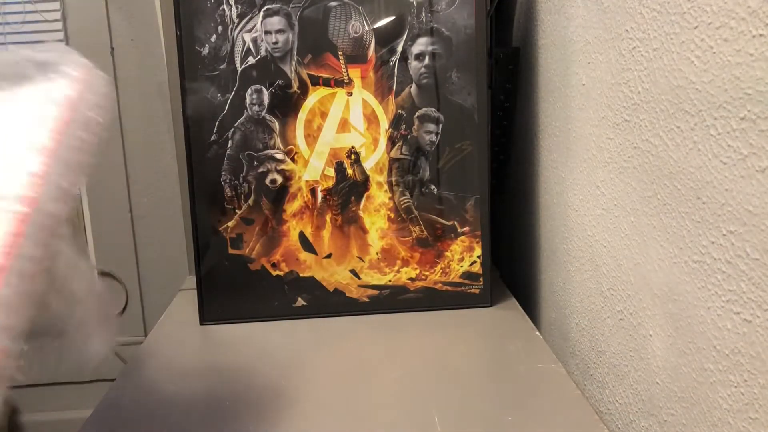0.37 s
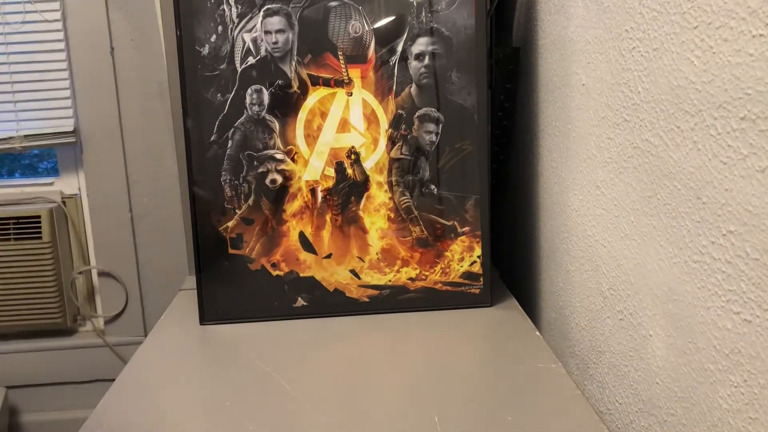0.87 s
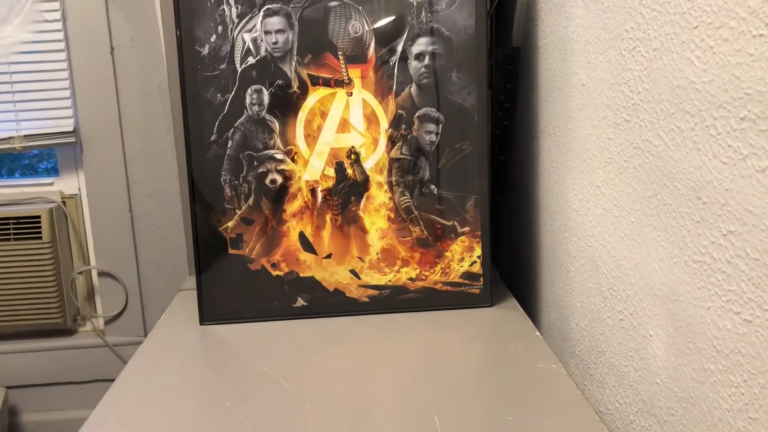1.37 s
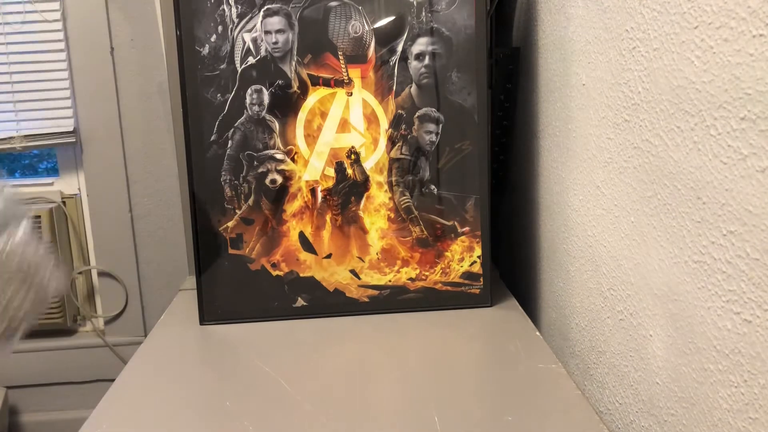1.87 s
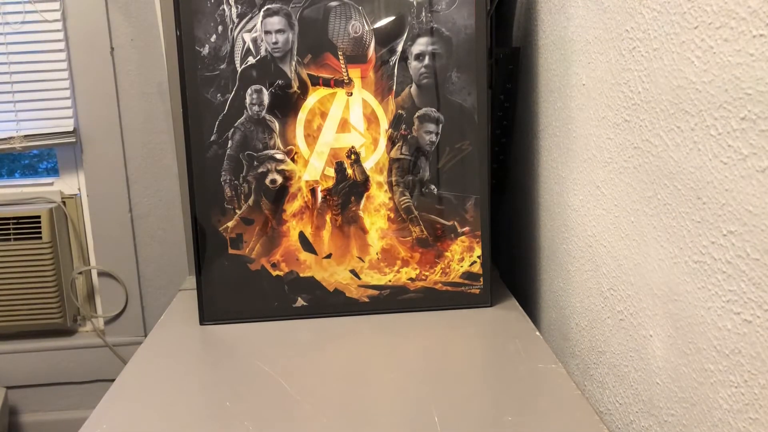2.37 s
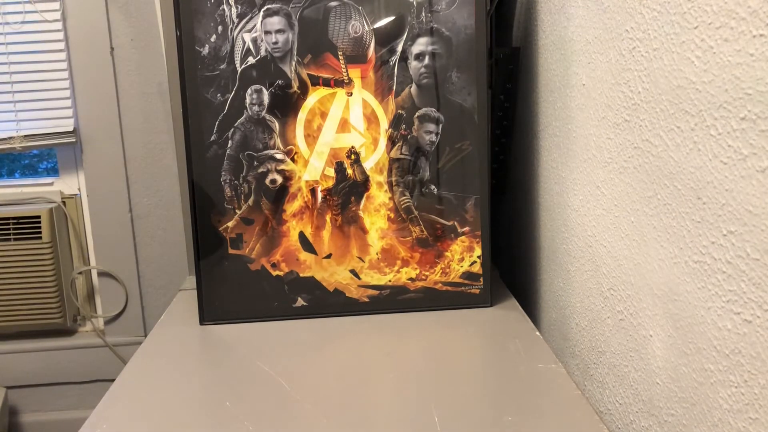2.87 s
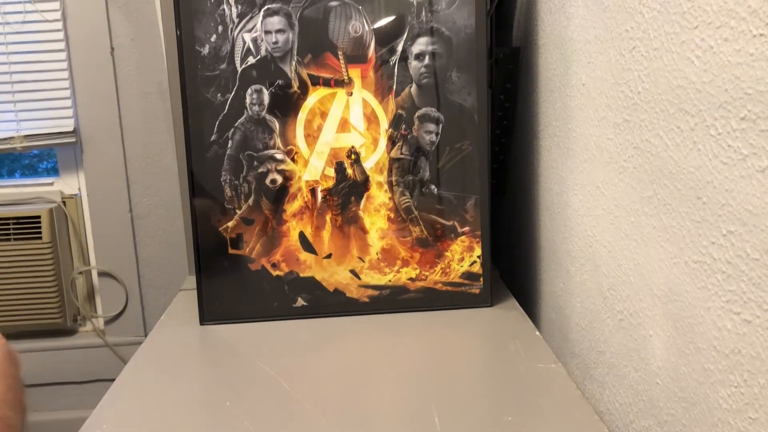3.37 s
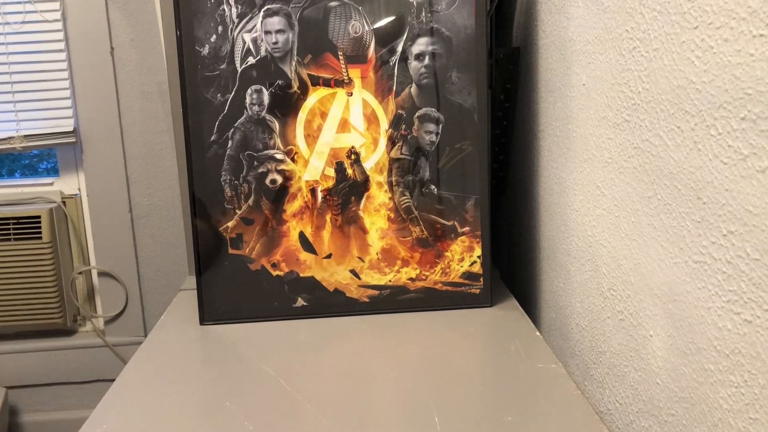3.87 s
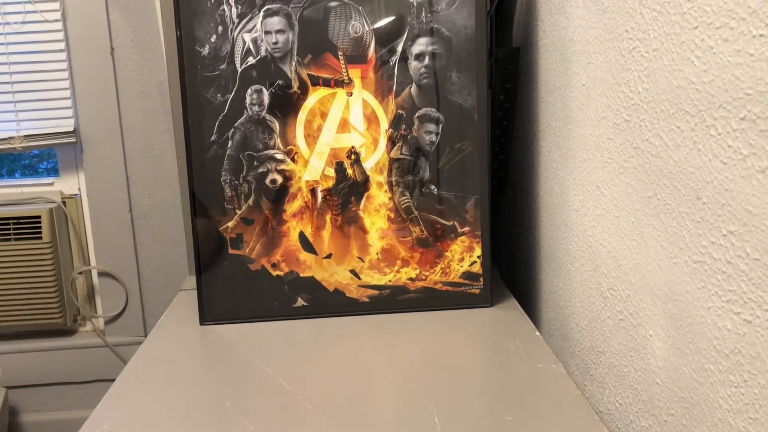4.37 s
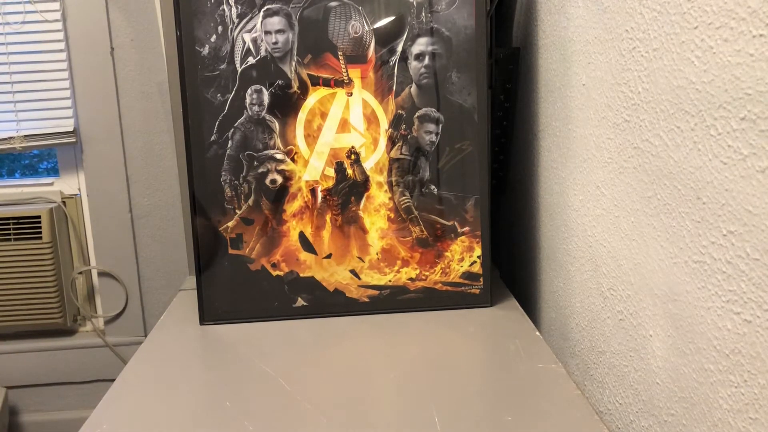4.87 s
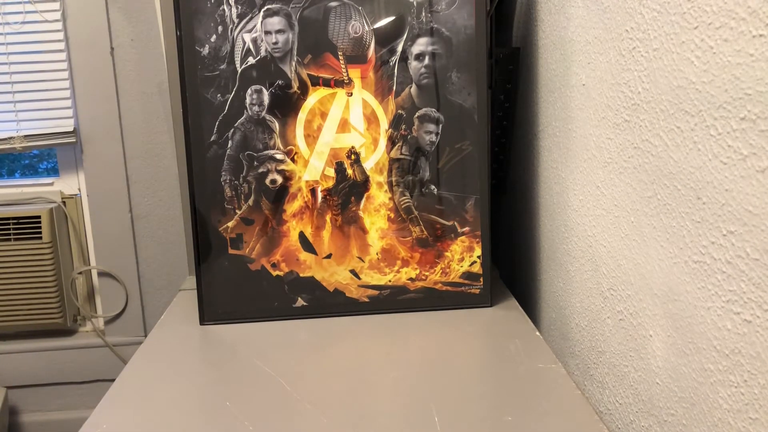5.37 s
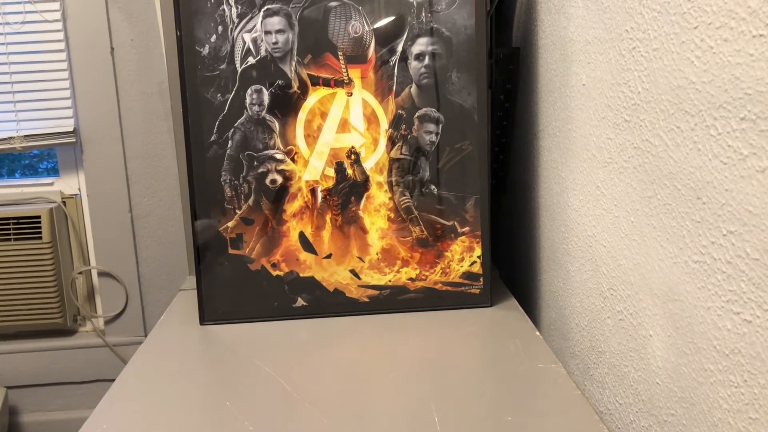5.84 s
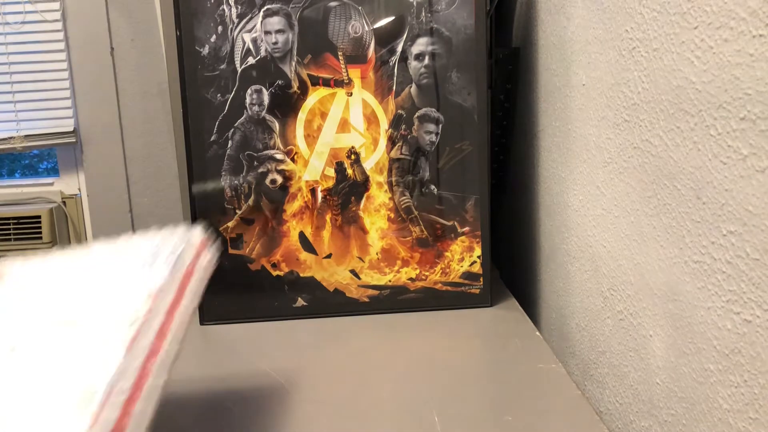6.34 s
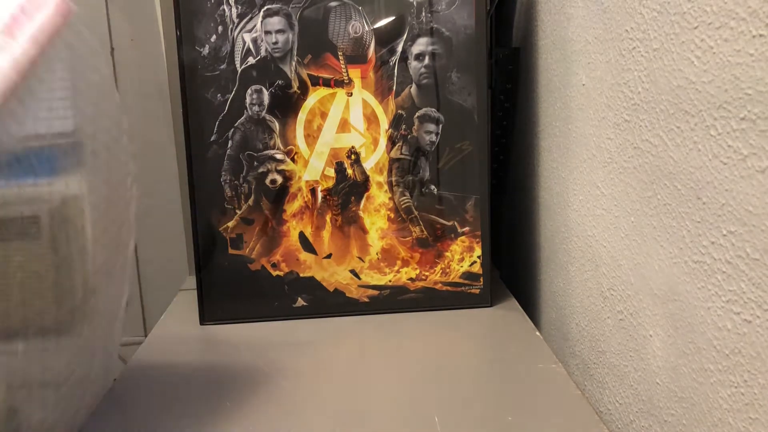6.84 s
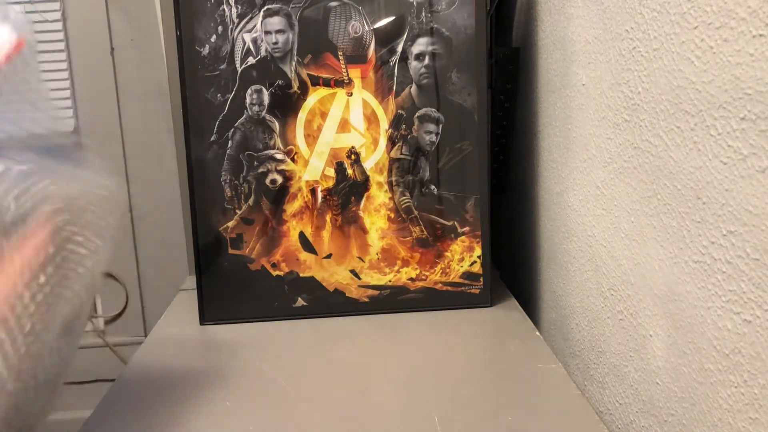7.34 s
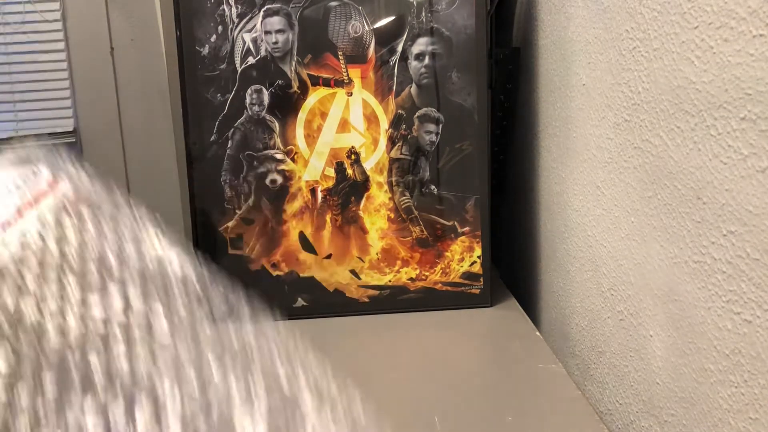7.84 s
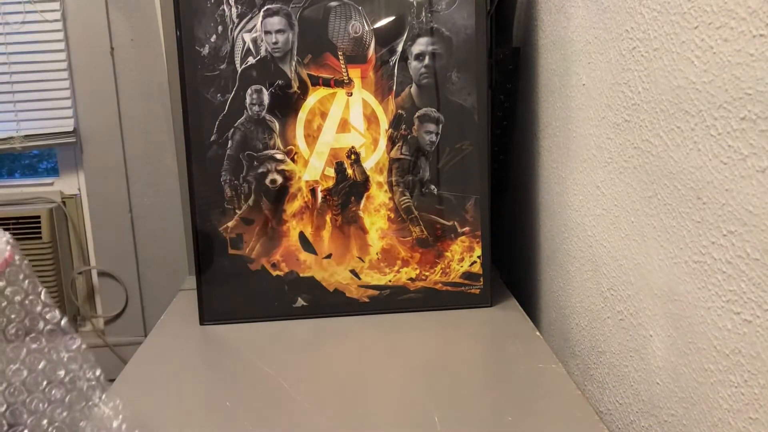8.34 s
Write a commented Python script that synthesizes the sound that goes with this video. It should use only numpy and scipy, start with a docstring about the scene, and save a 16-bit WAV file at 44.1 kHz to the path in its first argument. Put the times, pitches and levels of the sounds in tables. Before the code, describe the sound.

Crisp plastic film rustles and crackles close up in a small room, surging loudly, thinning to faint creaks, then surging and snapping again.

```python
"""A faint rustle of plastic film comes first, soon swelling grip by grip, with hollow knocks and low drags.
Bubble wrap is pulled off a parcel and crumpled by hand over a table in a small room, one microphone close by.
Creases buckling by the thousand are random clicks and noise in narrow bands; parcel and hands rubbing the
table are low noise; air pockets and folds ring as damped sines; snaps are short sprays of noise when a big
fold or strip of tape lets go. Dense, decaying noise makes the room's echoes."""
import sys
import numpy as np
from scipy import signal
from scipy.io import wavfile

SR = 44100
rng = np.random.default_rng(int(sys.argv[2]) if len(sys.argv) > 2 else 0)


def waveform_to_disk(signal):
    """Save audio, clipped to [-1, 1], as 16-bit WAV at the path in sys.argv[1]."""
    frames = np.transpose(np.atleast_2d(signal))
    scaled = np.clip(frames, -1, 1) * 32767
    samples = np.round(scaled).astype(np.int16)
    wavfile.write(sys.argv[1], SR, samples)


def voltage_ratio(level):
    """Linear amplitude factor for a level in decibels (scalar or array-like)."""
    return 10 ** (np.asarray(level, float) / 20)


N = 384543
STEP = 64   # samples between points of the level curves
EVENT = 4096   # samples given to each snap or knock


def rms_one(x):
    """Scales a signal to rms 1."""
    return x / np.sqrt(np.mean(x ** 2) + 1e-20)


def at_hz(points, hz):
    """Reads a spectrum table at a frequency, straight lines over log frequency."""
    table_hz, db = np.array(points).T
    return np.interp(np.log(hz), np.log(table_hz), db)


def band(x, low_hz, high_hz):
    """Keeps what lies between two frequencies."""
    edges = [low_hz, min(high_hz, .48 * SR)]
    return signal.sosfilt(signal.butter(2, edges, "band", fs=SR, output="sos"), x)


def drift(rate_hz):
    """Slow chance: noise at every 40th sample, twice through a one-pole low-pass; spread 1."""
    r = np.exp(-2 * np.pi * rate_hz * 40 / SR)
    noise = rng.standard_normal(N // 40 + 2002)
    slow = signal.lfilter([1], [1, -2 * r, r * r], noise)[2000:]
    return np.interp(np.arange(N) / 40, np.arange(len(slow)), rms_one(slow))


def ring(clicks, hz, t60):
    """A damped resonance: a unit click sets a sine of height 1 ringing, 60 dB down after t60 seconds."""
    r, w = voltage_ratio(-60 / (t60 * SR)), 2 * np.pi * hz / SR
    return signal.lfilter([0, np.sin(w)], [1, -2 * r * np.cos(w), r * r], clicks + 1e-18)


def grains(per_s, spread_db):
    """Random clicks of either sign, many small and a few large; rms 1."""
    sizes = voltage_ratio(spread_db * np.minimum(rng.exponential(1, N), 5))
    sizes = sizes * rng.choice([-1, 1], N)
    return rms_one(sizes * (rng.random(N) < per_s / SR))


def swells(rows):
    """Power of each row in time: an even climb in dB to its peak, an even fall after it."""
    s, db, swell, fade = np.array(rows)[:, :4].T[:, :, None]
    since = np.arange(0, N + STEP, STEP) / SR - s
    below_peak_db = 20 * np.where(since < 0, -since / swell, since / fade)
    return voltage_ratio(2 * (db - below_peak_db))


def every_sample(db):
    """Draws a level curve out to every sample."""
    return np.interp(np.arange(N) / STEP, np.arange(len(db)), db)


def air():
    """Steady, quiet broadband noise under everything."""
    return voltage_ratio(-68) * rms_one(band(rng.standard_normal(N), 40, 10000))


# Grips of the hands on the film, levels before the rustle's common lift:
# (peak time [s], level [dB], swell by 20 dB [s], fade by 20 dB [s], extra from fine creases [dB])
HAND_GRIPS = [(0.025, -55.1, 0.12, 0.156, 0.6), (0.158, -44.6, 0.056, 0.599, 0.5),
              (0.286, -34.6, 0.103, 0.155, 0.6), (0.377, -35.0, 0.056, 0.76, 0.4),
              (0.606, -34.6, 0.045, 0.26, -2.8), (0.735, -32.6, 0.044, 0.085, 0.1),
              (0.819, -31.3, 0.123, 0.104, -0.6), (0.94, -32.6, 0.064, 0.385, 0.3),
              (1.094, -25.9, 0.03, 0.319, -1.7), (1.282, -21.3, 0.36, 0.164, 0.7),
              (1.554, -43.9, 0.397, 0.112, 0.3), (1.656, -43.5, 0.076, 0.286, 2.7),
              (1.763, -41.3, 0.165, 0.183, -2.0), (1.998, -43.2, 0.024, 0.313, -1.4),
              (2.219, -40.5, 0.189, 0.209, 0.1), (2.38, -40.6, 0.304, 0.9, -0.3),
              (2.49, -41.2, 0.025, 0.435, -2.5), (3.031, -27.5, 0.108, 0.136, -0.4),
              (3.307, -51.3, 0.341, 0.434, -0.8), (3.627, -49.1, 0.235, 0.18, -1.5),
              (3.846, -50.0, 0.04, 0.428, -2.6), (3.996, -45.5, 0.177, 0.32, 1.3),
              (4.297, -45.0, 0.178, 0.35, 2.2), (4.518, -41.6, 0.116, 0.095, 0.6),
              (4.681, -41.9, 0.16, 0.23, 1.4), (4.836, -47.4, 0.103, 0.114, -0.7),
              (5.011, -47.8, 0.25, 0.22, -1.7), (5.08, -46.5, 0.016, 0.3, -1.6),
              (5.186, -46.6, 0.018, 0.267, -2.1), (5.305, -46.4, 0.029, 0.218, -2.4),
              (5.433, -48.4, 0.056, 0.126, -1.1), (5.555, -49.4, 0.091, 0.152, -2.0),
              (5.598, -39.8, 0.024, 0.084, -0.8), (5.704, -29.2, 0.063, 0.164, -1.1),
              (5.813, -29.9, 0.168, 0.139, -1.6), (5.949, -26.5, 0.024, 0.23, 1.2),
              (6.044, -29.7, 0.105, 0.056, -1.0), (6.158, -40.4, 0.053, 0.129, 1.2),
              (6.268, -42.5, 0.098, 0.111, -0.3), (6.405, -51.8, 0.091, 0.063, 1.6),
              (6.637, -47.8, 0.254, 0.256, 1.6), (6.832, -46.3, 0.368, 0.145, 1.4),
              (6.946, -46.1, 0.11, 0.085, 0.8), (7.125, -52.6, 0.018, 0.263, 1.5),
              (7.241, -39.4, 0.064, 0.202, 1.7), (7.38, -44.0, 0.076, 0.155, 1.0),
              (7.672, -45.9, 0.116, 0.172, 2.7), (7.806, -44.2, 0.177, 0.145, 1.2),
              (7.993, -46.1, 0.26, 0.362, -0.2), (8.232, -52.2, 0.067, 0.653, -0.7),
              (8.37, -39.4, 0.048, 0.088, -0.9), (8.504, -41.3, 0.069, 0.103, 1.0),
              (8.672, -44.2, 0.314, 0.045, -0.1), (8.695, -27.6, 0.021, 0.205, -1.5)]


def grips():
    """Squeezing hands buckle the film: its power, its level and that of its fine creases, both in dB."""
    resting_db = -63
    powers = swells(HAND_GRIPS)
    film_power = powers.sum(axis=0) + voltage_ratio(2 * resting_db)
    level_db = 10 * np.log10(film_power)
    # each grip's extra counts by its share of the power
    fine_db = level_db + np.array(HAND_GRIPS)[:, -1] @ powers / film_power
    return film_power, level_db, fine_db


# Colour of the rustling film, before drift and crease shifts:
# (frequency [Hz], relative level per hertz [dB])
FILM_COLOUR = [(210, -39), (350, -22.5), (539, -9), (707, -10.5), (1110, -4.5), (1450, -9), (1850, -5),
               (2460, -7), (4110, -3.5), (15000, -10.5), (16000, -10)]


def rustle(level_db, fine_db, large_db):
    """Small creases click in a few neighbouring bands, at slightly different moments; wide ones in all bands."""
    slips = np.abs(grains(110, spread_db=1.5))      # a slip starts at once and peters out
    slips = signal.lfilter([1], [1, -np.exp(-1 / (0.0067 * SR))], slips)
    crowd = np.clip((level_db + 51.5) / 30, 0, 1)      # hard crumpling: more creases at once, so smoother
    clumps = (1 + 0.28 * slips / slips.mean()) / 1.35 * voltage_ratio(drift(30))
    clumps = clumps ** (1 - 0.78 * crowd)
    wide = grains(500 * clumps ** 0.7 * (1 + 1.2 * crowd), spread_db=6.0)
    small = [grains(per_s * clumps, spread_db=4.0) for per_s in (320, 500, 800)]
    rubbing = rng.standard_normal((2, N))      # film sliding on film
    # only the swing of fine and large creases against the middling ones counts
    thin_db, thick_db = fine_db - level_db, large_db - level_db
    thin_db, thick_db = thin_db - thin_db.mean(), thick_db - thick_db.mean()
    edges = 350 * 2 ** np.arange(0, 5.7, 1 / 3)      # third octaves
    out = 0
    for k, (low, high) in enumerate(zip(edges, edges[1:])):
        hz = np.sqrt(low * high)
        own = np.roll(small[k // 6], rng.integers(0, 400))      # six bands share clicks, each at its own delay
        mixed = band(0.71 * own + 0.45 * wide + 0.95 * rubbing[k % 2], low, high)
        thin = np.clip(np.log2(hz / 6500) / 0.35, 0, 1)
        thick = np.clip(np.log2(2200 / hz) / 0.77, 0, 1)
        shift_db = thin * thin_db + thick * thick_db
        out = out + mixed * voltage_ratio(at_hz(FILM_COLOUR, hz) + shift_db + 1.8 * drift(7.5))
    return voltage_ratio(level_db + 4.2) * rms_one(out * clumps)


# Hollow knocks in the parcel and its air pockets, before a common lift of 4 dB:
# (time [s], peak level [dB], pitch [Hz])
POCKET_KNOCKS = [(0.127, -40, 1340), (0.245, -59, 1280), (0.605, -33.5, 1050), (0.802, -23.5, 1330),
                 (0.959, -21, 1200), (0.993, -25.5, 1280), (1.031, -32, 1600), (1.077, -26, 1270),
                 (1.096, -24, 1230), (1.208, -27, 1540), (1.231, -35, 1320), (1.256, -24, 1110),
                 (1.366, -26.5, 990), (3.007, -49, 1360), (3.028, -25, 1340), (3.837, -43, 1100),
                 (4.337, -35, 950), (4.677, -27, 715), (5.589, -33, 775), (5.615, -30.5, 880),
                 (5.693, -27, 1040), (5.852, -37, 1180), (5.952, -31.5, 1170), (6.581, -42, 1390),
                 (7.213, -37, 1060), (7.831, -36, 1250), (8.025, -40, 1270), (8.697, -32, 1180)]


def knocks():
    """A soft push rings the struck pocket for a few cycles; the loose walls rattle on around that pitch."""
    out, t = np.zeros(N + EVENT), np.arange(EVENT) / SR
    push = (t / .00025) * np.exp(-t / 0.00017)
    chance = rng.standard_normal((len(POCKET_KNOCKS), EVENT))
    for (s, peak_db, hz), rattle in zip(POCKET_KNOCKS, chance):
        pocket = ring(push, hz, 9 / hz)      # 60 dB down after nine cycles
        walls = band(rattle, hz / 1.3, hz * 1.88) * np.exp(-t / 0.011)
        knock = band(rms_one(pocket), 253, 2500) + 1.83 * rms_one(walls)
        at = round(s * SR)
        out[at:at + EVENT] += voltage_ratio(peak_db + 4.0) * knock / np.abs(knock).max()
    return out[:N]


# Parcel and hands thump or drag on the table, before the drag's own trim and drift:
# (peak time [s], level [dB], swell by 20 dB [s], fade by 20 dB [s])
TABLE_DRAGS = [(0.135, -47.9, 0.017, 0.674), (0.347, -46.9, 0.13, 0.092), (1.305, -40.2, 0.015, 0.248),
               (1.311, -47.3, 0.89, 0.247), (1.664, -44.2, 0.01, 0.075), (1.763, -49.2, 0.064, 0.116),
               (2.208, -51.3, 0.16, 0.329), (2.541, -52.4, 0.615, 0.185), (2.788, -56.2, 0.861, 0.056),
               (3.069, -38.9, 0.11, 0.117), (3.292, -50.0, 0.076, 0.108), (3.662, -59.0, 0.166, 0.132),
               (3.899, -49.1, 0.108, 0.404), (4.524, -49.2, 0.018, 0.064), (4.617, -58.2, 0.01, 0.795),
               (4.69, -48.6, 0.088, 0.059), (5.109, -61.9, 0.01, 0.759), (5.315, -52.7, 0.01, 0.037),
               (5.589, -43.8, 0.01, 0.074), (5.714, -39.1, 0.073, 0.187), (6.091, -38.5, 0.135, 0.214),
               (6.582, -58.6, 0.01, 0.606), (6.805, -51.4, 0.101, 0.269), (7.129, -55.8, 0.023, 0.077),
               (7.222, -44.7, 0.02, 0.202), (7.376, -46.0, 0.029, 0.095), (7.7, -51.6, 0.04, 0.092),
               (7.811, -51.6, 0.145, 0.067), (8.279, -53.7, 0.643, 0.068), (8.509, -55.8, 0.08, 0.9)]


def table_level(level_db):
    """Thumps and drags push on the table, and every grip shakes it: their joint level in dB."""
    resting_db, middling_grip_db = -74, -45
    # shake at a middling grip, then 0.6 dB for each dB of the grip's swing
    shake_db = -67 + 0.6 * (level_db - middling_grip_db)
    power = swells(TABLE_DRAGS).sum(axis=0) + voltage_ratio(2 * shake_db) + voltage_ratio(2 * resting_db)
    return 10 * np.log10(power)


# Colour of rubbing on the table top, before drift: (frequency [Hz], relative level per hertz [dB])
TABLE_COLOUR = [(21, -44), (40, -7), (80, -9), (108, -6), (161, -2.5), (343, -5), (468, -20.5), (500, -25),
                (650, -40), (1100, -120)]


def drag(level_db):
    """Hands and parcel rub the table top: lumpy low noise."""
    edges = 35 * 2 ** np.arange(0, 4.1, .5)      # half octaves
    out = 0
    white = rng.standard_normal((2, N))
    for k, (low, high) in enumerate(zip(edges, edges[1:])):
        gain_db = at_hz(TABLE_COLOUR, np.sqrt(low * high)) + 3.3 * drift(9.2)
        out = out + band(white[k % 2], low, high) * voltage_ratio(gain_db)
    return voltage_ratio(level_db - 0.3 + 1.16 * drift(23)) * rms_one(out)


# Large sheets flex with a duller rustle; the rustle uses only their swing against the grips:
# (peak time [s], level [dB], swell by 20 dB [s], fade by 20 dB [s])
LARGE_SHEETS = [(0.161, -47.1, 0.047, 0.705), (0.283, -38.5, 0.1, 0.334), (0.966, -36.8, 0.06, 0.476),
                (1.355, -35.2, 0.063, 0.074), (2.44, -48.8, 0.707, 0.593), (3.024, -37.5, 0.028, 0.148),
                (3.659, -59.4, 0.778, 0.19), (3.84, -54.9, 0.024, 0.409), (4.368, -53.1, 0.308, 0.03),
                (4.529, -50.9, 0.021, 0.129), (4.602, -52.6, 0.024, 0.611), (4.677, -36.0, 0.01, 0.074),
                (5.465, -58.5, 0.9, 0.057), (5.74, -36.8, 0.165, 0.23), (5.973, -37.7, 0.027, 0.272),
                (6.819, -53.4, 0.257, 0.287), (7.131, -54.2, 0.031, 0.169), (7.27, -49.0, 0.134, 0.302),
                (7.678, -52.0, 0.032, 0.1), (7.773, -49.8, 0.029, 0.139), (8.11, -52.4, 0.457, 0.415),
                (8.611, -51.8, 0.06, 0.197)]


def sheets(film_power):
    """Wide sheets bend on their own, and a little in every grip: level of the large creases in dB."""
    in_grip_db = -11
    return 10 * np.log10(swells(LARGE_SHEETS).sum(axis=0) + voltage_ratio(2 * in_grip_db) * film_power)


# Folds or tape letting go, peaks before the loose rustle behind is added:
# (time [s], peak level [dB], colour frequency that places the bands [Hz])
FOLD_SNAPS = [(.4674, -17, 4920), (.535, -24, 8000), (.6032, -19, 3820), (.6178, -16.5, 4820),
              (.6367, -11, 5310), (.6503, -22, 5150), (.699, -21, 5050), (.7252, -13, 6820),
              (.785, -17, 6560), (.8021, 0, 6000), (.8643, -18, 6270), (.9434, -14, 6250),
              (1.0344, -6, 5100), (1.0756, -14, 6700), (1.0956, -9, 5360), (1.1953, -10, 5000),
              (1.3647, -3, 7110), (1.4861, -23.5, 6730), (1.6376, -24, 8640), (1.7596, -17, 5600),
              (2.0004, -21, 7150), (2.0273, -24, 4420), (2.171, -20.5, 6050), (2.314, -25, 5900),
              (2.3383, -20.5, 5520), (2.4824, -22, 6310), (2.4896, -21, 6600), (2.7383, -29, 4540),
              (2.7823, -29, 4940), (2.7534, -28, 4050), (2.9454, -25, 5240), (2.9867, -13, 4810),
              (2.993, -15, 6350), (3.008, -11, 4530), (3.2339, -22, 10280), (3.59, -29, 6880),
              (3.8388, -25.5, 2910), (4.0362, -21, 5930), (4.144, -23.5, 7760), (4.2504, -27, 5170),
              (4.2807, -22, 5280), (4.337, -12.5, 7670), (4.5156, -24, 4880), (4.522, -18, 5370),
              (4.6211, -25.5, 6450), (4.6524, -24, 8220), (4.6732, -16, 6540), (4.678, -13, 5030),
              (4.7267, -10, 6400), (5.077, -27, 6000), (5.1824, -22, 4800), (5.2985, -28, 6190),
              (5.5902, -14.5, 5550), (5.667, -12.5, 5160), (5.6916, -9.5, 5500), (5.6971, -14, 4820),
              (5.7177, -10, 5000), (5.8088, -14, 6290), (5.8526, -7, 5670), (5.9312, -17, 6830),
              (5.9406, -8, 9340), (5.9521, -6, 8380), (5.957, -6, 7330), (5.9766, -10, 6740),
              (6.58, -23, 9700), (6.6642, -25, 7550), (7.1259, -28.5, 5150), (7.6597, -24, 7000),
              (7.6857, -24.5, 5020), (7.713, -25, 5220), (7.771, -28, 5910), (7.797, -24, 5310),
              (7.8345, -23, 4650), (7.938, -29, 5130), (8.0257, -21, 3800), (8.122, -29.5, 6570),
              (8.3569, -26, 5900), (8.3631, -25, 6170), (8.3744, -15, 5900), (8.4963, -25, 5790),
              (8.507, -25, 5790), (8.679, -24, 8370), (8.6849, -7, 7400), (8.6968, -1, 6500),
              (8.7185, -10, 5000)]


def snaps():
    """A sharp release, a short spray of tearing, the table's echo of both, and a rustle that dies behind it."""
    shortest_tear_s, tear_spread = .00045, 3.5      # decay time; the longest is this many times more
    out, t = np.zeros(N + EVENT), np.arange(EVENT) / SR
    chance = rng.standard_normal((len(FOLD_SNAPS), 2, EVENT))
    draws = rng.random((len(FOLD_SNAPS), 3))
    for (s, peak_db, hz), (tear, loose), (lag, tune, long) in zip(FOLD_SNAPS, chance, draws):
        spray = tear * np.abs(tear) * np.exp(-t / (shortest_tear_s * tear_spread ** long))
        spray[0] = 3.3      # the release itself
        lag = round((0.001194 + .0014 * lag) * SR)      # delay of the table's echo
        spray[lag:] += voltage_ratio(-6.5) * spray[:-lag]
        fold_hz = hz * (0.607 + .5 * tune)
        fold = ring(spray, fold_hz, 12 / fold_hz)      # 60 dB down after twelve cycles
        snap = rms_one(band(spray, hz / 3.7, hz * 2.0)) + 0.22 * rms_one(fold)
        behind = band(loose * np.abs(loose), hz / 2.4, hz * 1.45) * np.exp(-t / 0.015)
        at = round(s * SR)
        out[at:at + EVENT] += voltage_ratio(peak_db) * (snap / np.abs(snap).max() + voltage_ratio(-30.5) * behind)
    return out[:N]


def room(x):
    """Dense echoes from a few milliseconds on, the treble dying sooner than the rest."""
    t60_s, treble_share = 0.27, 0.78
    t = np.arange(SR // 2) / SR
    echoes = rng.standard_normal(len(t)) * np.clip((t - .004) / 0.0047, 0, 1)
    dull = band(echoes, 80, 9000)
    tail = dull * voltage_ratio(-60 * t / t60_s)
    tail = tail + (echoes - dull) * voltage_ratio(-60 * t / (treble_share * t60_s))
    return signal.fftconvolve(x, tail / np.sqrt(np.sum(tail ** 2)))[:N]


def scene():
    """Film, hits, table, echoes and air summed, the same in both channels."""
    film_power, level_db, fine_db = grips()
    large_db = sheets(film_power)
    film = rustle(every_sample(level_db), every_sample(fine_db), every_sample(large_db))
    hits = knocks() + snaps()
    table = drag(every_sample(table_level(level_db)))
    echoes = room(voltage_ratio(-8.5) * hits + voltage_ratio(-15.5) * film)
    mono = film + hits + echoes + table + air()
    return np.array([mono, mono])


def band_limit(x):
    """A steep low-pass at the top of the band."""
    return signal.sosfilt(signal.butter(12, 17080, fs=SR, output="sos"), x)


def record(dry):
    """The close microphone drops the deep bass and rounds the highest peaks; the top is cut steeply."""
    heard = signal.sosfilt(signal.butter(3, 57.6, "high", fs=SR, output="sos"), dry)
    rounded = 1.1 * np.tanh(heard / 1.1)
    # 50 dB down from 16167 Hz up
    finished = signal.sosfilt(signal.cheby2(14, 50, 16167, fs=SR, output="sos"), rounded)
    return band_limit(finished)


dry = scene()
out = record(dry)
waveform_to_disk(out)
```